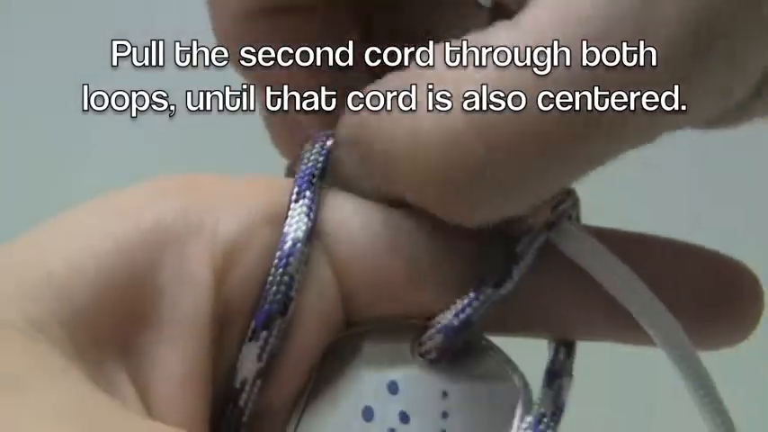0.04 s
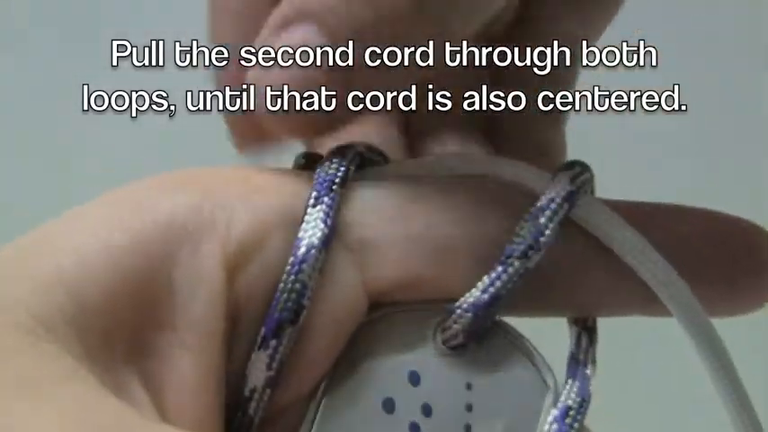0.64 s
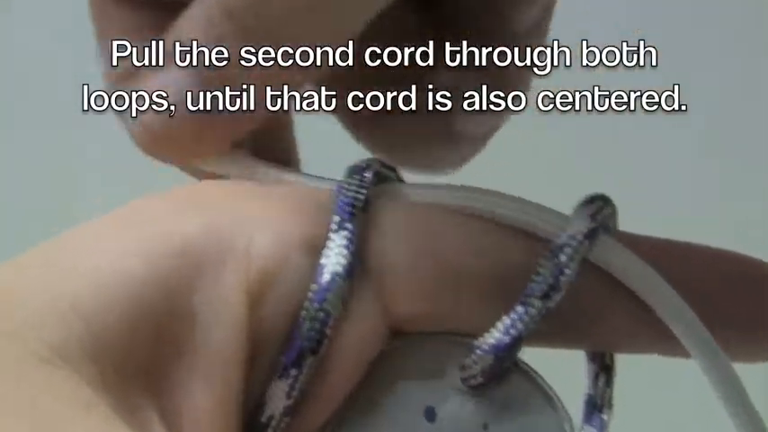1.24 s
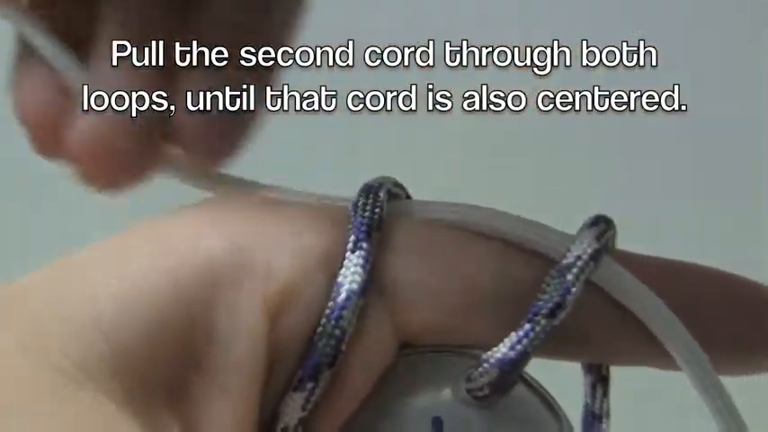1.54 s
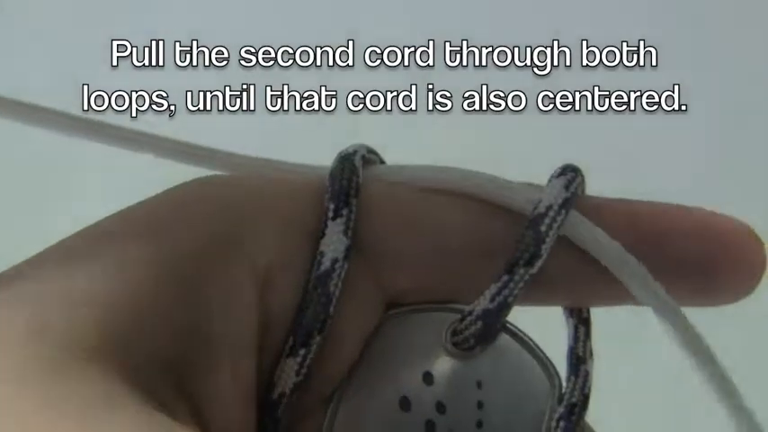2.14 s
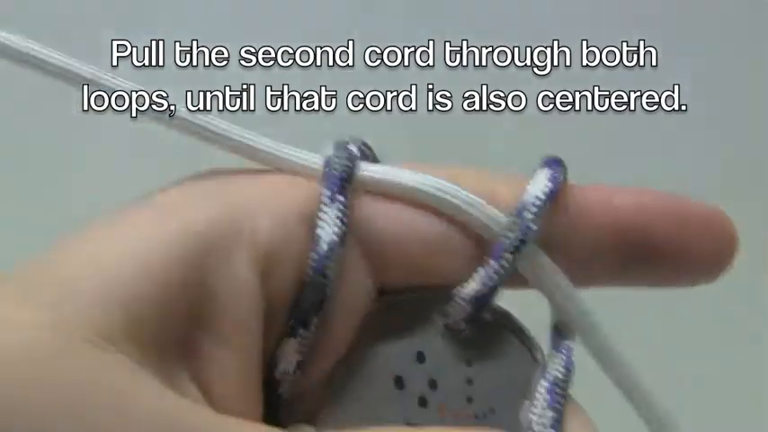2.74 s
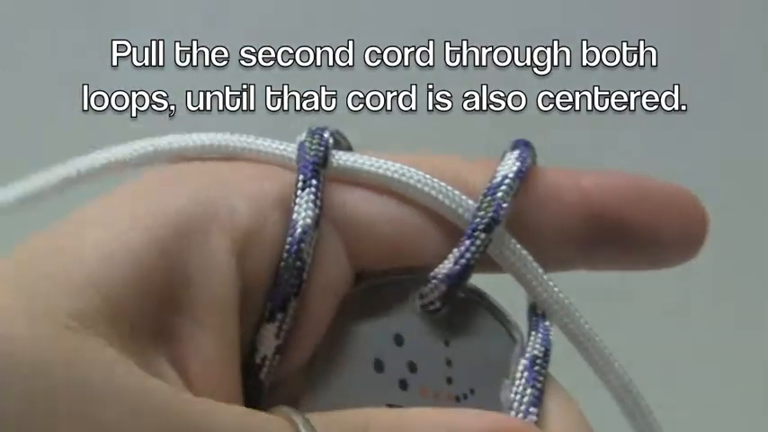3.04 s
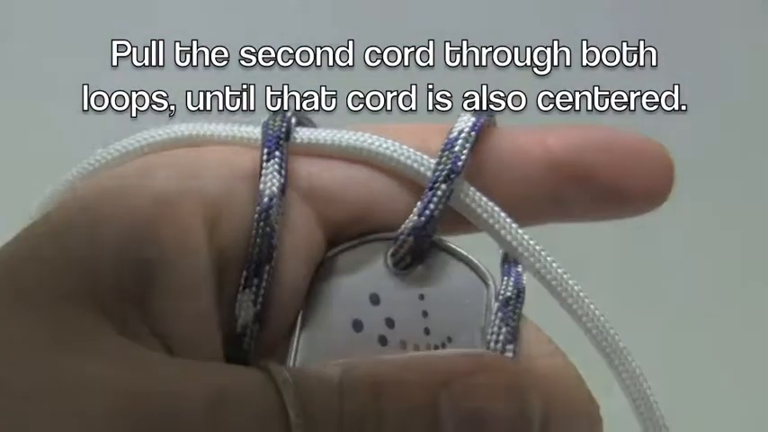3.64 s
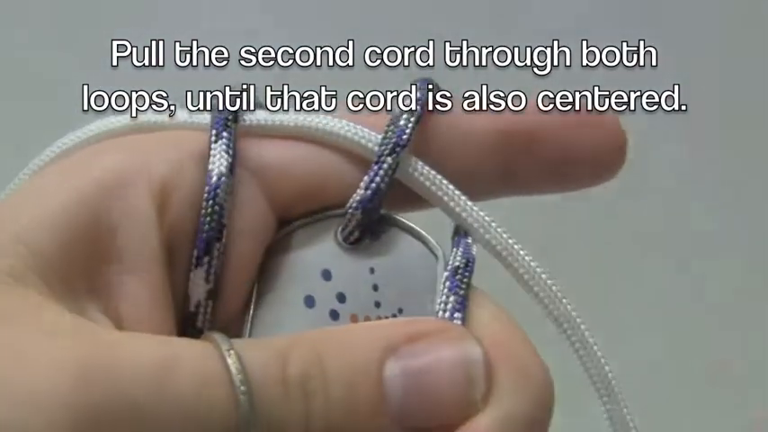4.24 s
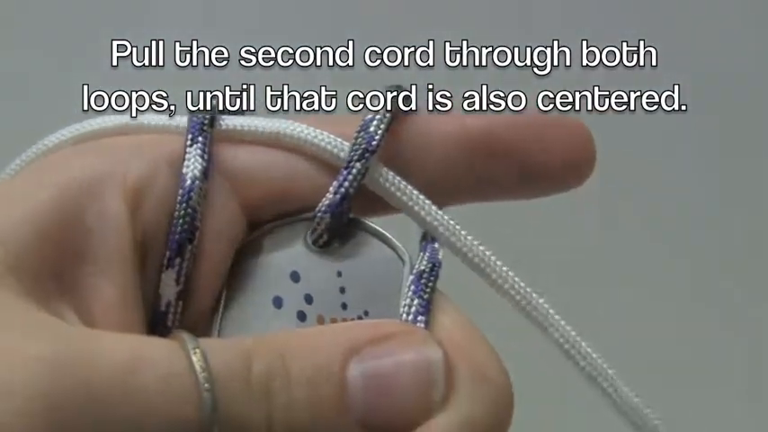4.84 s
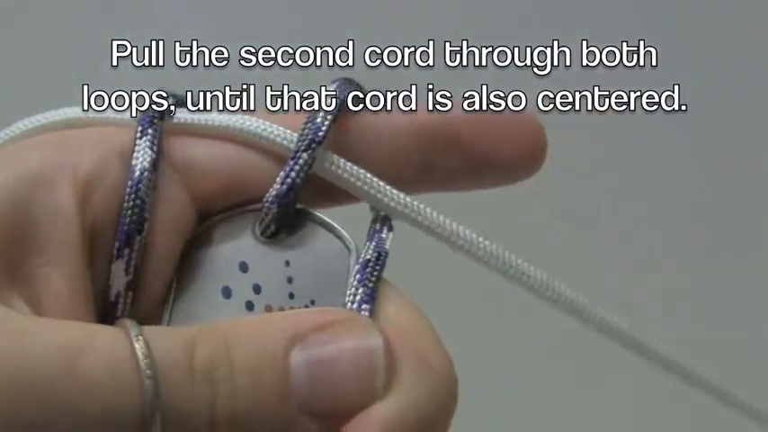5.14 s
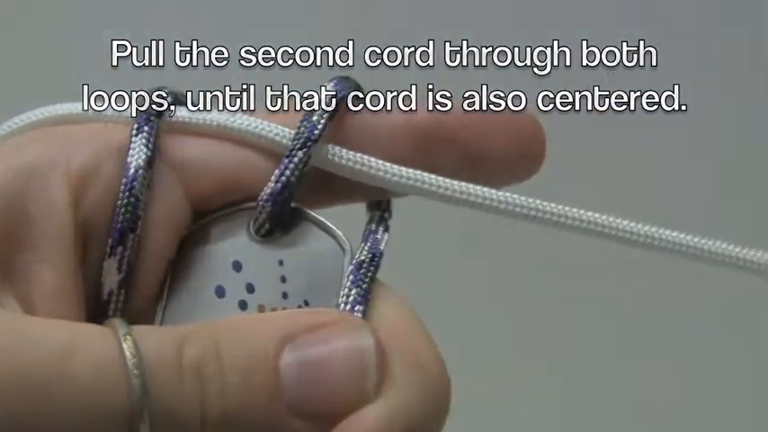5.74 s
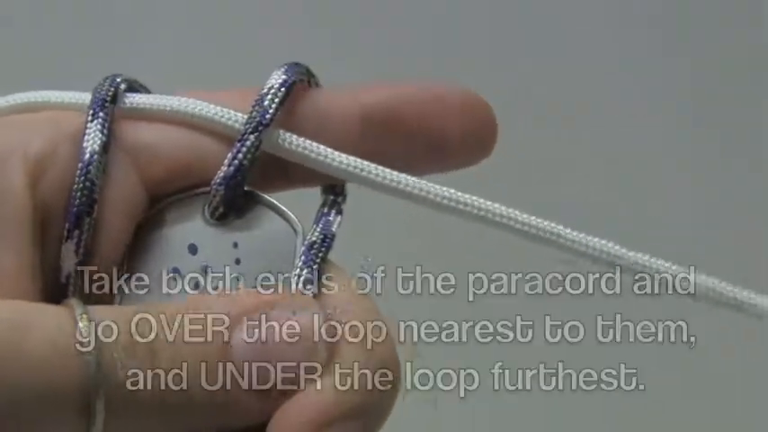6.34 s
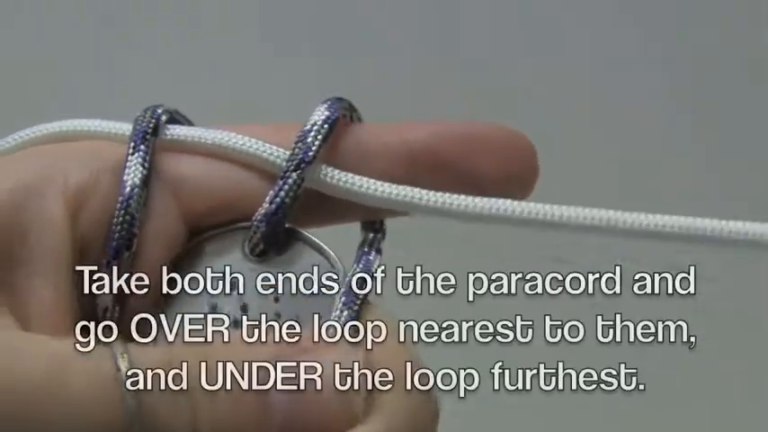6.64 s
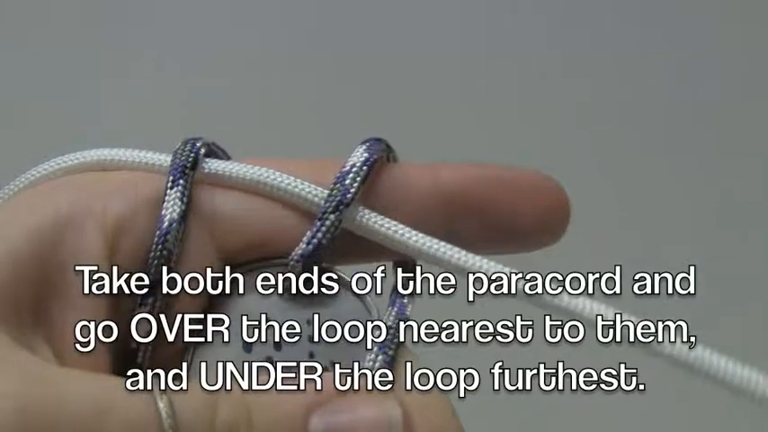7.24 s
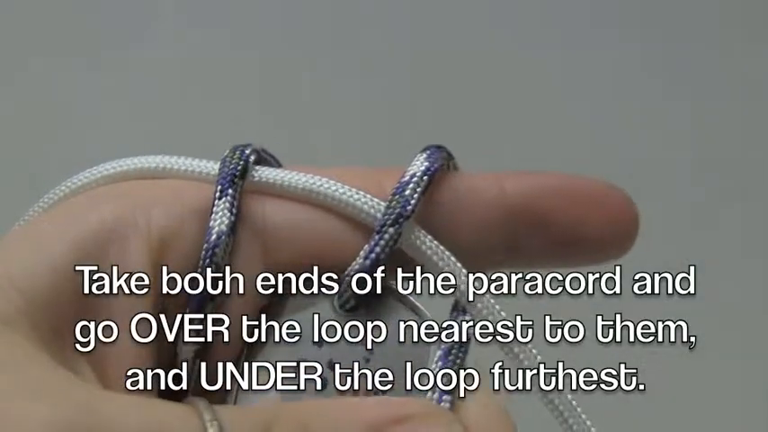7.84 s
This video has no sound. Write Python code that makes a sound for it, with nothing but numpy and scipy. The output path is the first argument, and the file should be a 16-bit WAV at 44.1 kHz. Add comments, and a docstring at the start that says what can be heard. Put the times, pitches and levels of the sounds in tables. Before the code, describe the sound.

A few small fingernail clicks lead into the soft hiss of nylon cord being pulled through loops, heard up close. Midway comes the loudest sound, a hard object hitting a table and bouncing once, leaving a brief ring. Soft finger bumps and a scratchy, slightly squeaky pull follow, then the slack cord flops and slides on the table. Low mains hum and ventilation noise fill the small room throughout.

```python
"""Mains hum and ventilation rumble fill a small room; close by, fingers tick on a nylon cord.
The cord glides through two loops on a finger with the fine hiss of stick-slip friction. Something
hard drops on the work table and bounces once, exciting its normal modes. The cord is drawn back:
its weave rasps through the loops, and its loose length slaps and scrapes on the table."""
import sys
import numpy as np
from scipy import signal
from scipy.fft import rfft, irfft, next_fast_len
from scipy.io import wavfile
from scipy.ndimage import uniform_filter1d, map_coordinates

SR = 44100
rng = np.random.default_rng(int(sys.argv[2]) if len(sys.argv) > 2 else 0)


def store_wav(level_fs):
    """Save 16-bit WAV to argv[1]."""
    pcm = np.round(np.clip(np.atleast_2d(level_fs), -1, 1) * 32767)
    wavfile.write(sys.argv[1], SR, pcm.T.astype(np.int16))


N = 347946
TIME = np.arange(N) / SR


def from_db(db):
    """Amplitude ratio of a level in decibels."""
    return 10 ** (np.asarray(db) / 20)


def rms_one(x):
    """Normalisation to unit power."""
    return x / np.sqrt(np.mean(x ** 2) + 1e-20)


def at_hz(points, hz, column=1):
    """Interpolation of a table along log frequency."""
    points = np.array(points)
    return np.interp(np.log(np.maximum(hz, 1)), np.log(points[:, 0]), points[:, column])


def add(track, s, sound):
    """Superposition of a sound on a track, from time s."""
    start = max(round(s * SR), 0)
    track[start:start + len(sound)] += sound[:N - start]


def colour(x, spectrum, size=4096):
    """Minimum-phase filtering at unit energy: folding the cepstrum makes the response causal."""
    hz = np.fft.rfftfreq(size, 1 / SR)
    cepstrum = irfft(np.log(from_db(at_hz(spectrum, hz))))
    cepstrum[1:size // 2] *= 2
    cepstrum[size // 2 + 1:] = 0
    response = irfft(np.exp(rfft(cepstrum)))
    return signal.oaconvolve(x, response / np.linalg.norm(response))[:len(x)]


def resonate(x, hz, width_hz):
    """Second-order resonance with unit peak gain."""
    hz = min(hz, .4 * SR)
    quality = hz / min(width_hz, SR / 3)
    return signal.lfilter(*signal.iirpeak(hz, quality, fs=SR), x)


def resonate_twice(x, hz, half_width_hz):
    """Two equal resonators in cascade give steeper skirts."""
    return resonate(resonate(x, hz, 2 * half_width_hz), hz, 2 * half_width_hz)


def drift(per_s):
    """Random modulation of unit rms, linear between knots."""
    knots = rng.standard_normal(int(TIME[-1] * per_s) + 2)
    return rms_one(np.interp(TIME * per_s, np.arange(len(knots)), knots))


def envelope(s, db):
    """Smoothed amplitude envelope of a level curve, silent beyond its ends."""
    return uniform_filter1d(from_db(np.interp(TIME, s, db, left=-200, right=-200)), size=128)


# hum partials: f/Hz (rounded below to a mains harmonic), rms level/dB
HUM_PARTIALS = [(59.2, -62), (118.4, -60.5), (177.6, -73), (236.9, -80), (479.1, -79), (597.5, -71),
                (721.4, -73), (839.8, -80.5), (1141, -80.5), (1200, -83.5), (1260, -81.5), (1319, -81),
                (1620, -90), (1798, -83.5)]

def hum(mains_hz=60, dip_s=4.76, beat_s=4.7, beat_depth=0.24):
    """Harmonic series of the mains: each partial wavers in level and the fundamental beats slowly."""
    out = np.zeros(N)
    beat = np.abs(1 - beat_depth * np.exp(2j * np.pi * (TIME - dip_s) / beat_s))
    for hz, db in HUM_PARTIALS:
        harmonic = round(hz / mains_hz)
        gain = from_db(db + 1.1 * drift(3.3)) * (beat if harmonic == 1 else 1)
        out += np.sqrt(2) * gain * np.sin(2 * np.pi * (harmonic * mains_hz * TIME + rng.random()))
    return out


# background noise spectrum: f/Hz, relative level/dB
AIR_SPECTRUM = [(20, -9), (32, -11), (42, -2.5), (75, -5), (100, -2), (170, -3.5), (300, -2.5), (450, -9),
                (700, -11), (1000, -15), (2000, -18), (4000, -21.5), (8000, -25), (15500, -31.5)]
# likeness of left and right: f/Hz, coherence
AIR_COHERENCE = [(60, 0.68), (150, 0.97), (400, 0.4), (2400, 0.58), (15000, 0.53)]

def air(level_db=-58):
    """Partially coherent noise: ventilation rumble and microphone hiss, most alike in the bass."""
    size = next_fast_len(N)
    hz = np.fft.rfftfreq(size, 1 / SR)
    mid, side = rfft(rng.standard_normal((2, size))) * from_db(at_hz(AIR_SPECTRUM, hz))
    coherence = np.clip(at_hz(AIR_COHERENCE, hz), 0, 1)
    stereo = np.sqrt(1 + coherence) * mid + np.sqrt(1 - coherence) * side * [[1], [-1]]
    return from_db(level_db) * rms_one(irfft(stereo)[:, :N])


def impact(decay, size=4096):
    """Broadband excitation: decaying noise, repeatedly whitened and cut at three time constants."""
    t = TIME[:size]
    burst = rng.standard_normal(size) * np.exp(-t / decay)
    for _ in range(6):
        spectrum = rfft(burst)
        burst = irfft(spectrum / (np.abs(spectrum) + 1e-12)) * (t < 3 * decay)
    return burst


def at_level(burst, db, decay):
    """Energy scaling to match an exponential decay that starts at this rms level."""
    return from_db(db) * np.sqrt(decay * SR / 2) * burst / np.linalg.norm(burst)


# snaps of nail and braid: t/s, level/dB, decay/s, tilt/(dB per octave)
TICKS = [(0.131, -45.5, 0.0045, 8.5), (0.3017, -49.5, 0.0017, -1), (0.3759, -34.5, 0.0018, 6.5),
         (2.8978, -49, 0.011, -3.5), (2.916, -52, 0.011, 1), (5.135, -51.5, 0.008, 6),
         (5.352, -42, 0.0027, 1), (5.3643, -41, 0.0022, 0), (6.0172, -31.5, 0.00157, -1),
         (6.0313, -37, 0.0011, -2), (6.061, -30.5, 0.0035, -3), (6.1222, -42.5, 0.0032, 3)]
# spectrum common to all snaps: f/Hz, relative level/dB
TICK_SPECTRUM = [(200, -23), (600, -11.5), (1300, -5), (2300, -2), (4100, -2.5), (4750, 3), (5500, -2),
                 (6400, -7.5), (8300, -8.5), (9400, -5.5), (11000, -14.5), (12700, -14), (14200, -18),
                 (16000, -27)]

def ticks():
    """Impulsive release of nails and snagged strands; spectral tilt sets each snap's brightness."""
    out = np.zeros(N)
    for s, db, decay, tilt in TICKS + snags():
        spectrum = [(hz, level + tilt * np.log2(hz)) for hz, level in TICK_SPECTRUM]
        add(out, s, at_level(colour(impact(decay), spectrum), db, decay))
    return out


# snagging as the cord is fed in and drawn back: start t/s, end t/s, level/dB
SNAG_SPELLS = [(0.555, 0.9, -55), (5.382, 6.02, -41.5)]

def snags(per_s=13, spread_db=3.0, decay_s=0.0027, tilt_db_per_octave=2.0):
    """Jittered pulse train: strands catch once per time slot, giving further rows of ticks."""
    rows = []
    for start, end, db in SNAG_SPELLS:
        for slot, (jitter, strength, tilt) in enumerate(rng.uniform(-1, 1, (20, 3))):
            s = start + (slot + .5 + .5 * jitter) / per_s
            if s < end:
                rows.append((s, db + spread_db * strength, decay_s, tilt_db_per_octave * tilt))
    return rows


def friction(per_s, spread_db, flutter_db, flutter_per_s):
    """Stick-slip friction as shot noise: fibres let go unevenly, fluttering as the weave passes."""
    sizes = from_db(spread_db * np.minimum(rng.exponential(1, N), 4)) * rng.choice([-1, 1], N)
    slips = sizes * (rng.random(N) < per_s / SR)
    return rms_one(slips * from_db(flutter_db * drift(flutter_per_s)))


# hiss of the first pull, standing for its speed: t/s, level/dB
GLIDE_LEVELS = [(1.16, -87), (1.222, -62), (1.332, -57), (1.53, -60), (1.564, -55.5), (1.804, -59.5),
                (2.306, -53), (2.774, -49.5), (2.87, -58.5), (2.89, -70)]
# friction spectra of slack and of taut cord: f/Hz, relative level/dB
SLACK_SPECTRUM = [(1180, -44), (2000, -9), (2220, -14), (2910, 1.5), (3520, -11.5), (4120, -9), (4730, -1),
                  (5300, -2.5), (6090, -11.5), (7250, -7.5), (8630, -9.5), (11400, -13.5), (13200, -14),
                  (15200, -18), (16000, -45)]
TAUT_SPECTRUM = [(1180, -45), (2000, -16), (2260, -15), (2460, -17), (2710, -11), (3490, -14), (4820, -3),
                 (5490, -1.5), (6820, -9), (8260, -3.5), (9920, -5), (10900, -9), (14700, -15),
                 (16000, -24)]

def glide(tighten_from_s=1.78, tighten_s=0.52, slack_tension=0.1, trim_db=1):
    """Sliding friction: tension raises the resonances, by an equal-power fade from slack to taut."""
    slips = friction(per_s=18000, spread_db=3.5, flutter_db=1.0, flutter_per_s=150)
    tension = np.clip(slack_tension + np.maximum(TIME - tighten_from_s, 0) / tighten_s, 0, 1)
    slack = colour(slips, SLACK_SPECTRUM)
    taut = colour(slips[::-1], TAUT_SPECTRUM)  # reversal decorrelates the two
    hiss = np.sqrt(1 - tension) * slack + np.sqrt(tension) * taut
    return envelope(*np.transpose(GLIDE_LEVELS)) * from_db(trim_db + drift(22.44)) * hiss


# light touches of cord and hand: centre t/s, duration/s, level/dB, f/Hz, resonator half-width/Hz
BRUSHES = [(1.696, 0.05, -58, 5000, 1200), (2.153, 0.43, -62, 450, 396), (2.93, 0.082, -56, 36.2, 30),
           (2.957, 0.36, -66.5, 2630, 220), (3.992, 0.09, -59.5, 4240, 2600),
           (4.772, 0.098, -63.5, 11000, 5000), (5.069, 0.053, -54.5, 535, 300),
           (5.07, 0.05, -58, 4400, 1500), (5.186, 0.042, -48.5, 2780, 300), (5.439, 0.035, -50, 434, 200),
           (5.53, 0.18, -50.5, 4140, 1000), (5.889, 0.053, -45, 2460, 1400), (6.041, 0.15, -51, 3000, 3850),
           (6.145, 0.18, -58, 2100, 1510), (6.903, 0.23, -64, 2580, 506), (7.689, 0.19, -56, 220, 216)]

def brushes():
    """Band-limited friction: each touch swells and fades in one resonance."""
    out = np.zeros(N)
    slips = friction(per_s=6000, spread_db=-0.5, flutter_db=2.0, flutter_per_s=120)
    for s, length, db, hz, half_width in BRUSHES:
        start = s - length / 2
        swell = np.sqrt(np.hanning(int(length * SR)))
        touch = slips[int(start * SR):][:len(swell)]
        band = rms_one(resonate_twice(touch, hz, half_width))
        add(out, start, from_db(db) * swell[:len(touch)] * band)
    return out


# soft landings of the fingers: t/s, level/dB, decay/s, f/Hz, resonator half-width/Hz
BUMPS = [(2.173, -47.5, 0.0073, 700, 1440), (5.042, -46, 0.0033, 750, 900),
         (5.121, -35.5, 0.0087, 463, 138), (5.168, -43, 0.004, 550, 500), (5.58, -43.5, 0.0073, 380, 150),
         (7.655, -50.5, 0.0046, 380, 1000)]

def bumps():
    """Damped impact: each finger excites one low resonance."""
    out = np.zeros(N)
    for s, db, decay, hz, half_width in BUMPS:
        add(out, s, at_level(resonate_twice(impact(decay), hz, half_width), db, decay))
    return out


# contacts of the falling object: t/s, level/dB, decay/s, low-pass f/Hz
KNOCKS = [(3.5203, -25.5, 0.003, 1970), (3.525, -16, 0.0043, 5000), (3.5255, -7.5, 0.0027, 13700),
          (3.5386, -27.5, 0.0039, 14000), (3.6200, -27.5, 0.0056, 13200)]
# contact spectrum: f/Hz, relative level/dB
KNOCK_SPECTRUM = [(60, -25.5), (150, -18.5), (260, -3), (570, -4.5), (800, -9), (1500, -9.5), (2200, -6.5),
                  (2650, -1), (3200, -6), (4100, 0), (5500, -3.5), (7500, -2.5), (10300, -13.5),
                  (11700, -7.5), (16000, -17)]
# normal modes of the table: f/Hz, level/dB re the bare contact, T60/s
TABLE_MODES = [(97, 20.5, 0.76), (276, 3, 0.63), (405, 7.5, 0.27), (1607, 3.5, 0.13), (2436, -3, 0.29),
               (2615, 5, 0.03), (2700, -3, 0.3), (2770, -6, 0.29)]

def drop():
    """Modal excitation: a dull touch, a sharp clack and one bounce each set the table ringing."""
    contacts = np.zeros(N)
    for s, db, decay, cutoff_hz in KNOCKS:
        lowpass = signal.butter(1, cutoff_hz, fs=SR)
        contact = signal.lfilter(*lowpass, colour(impact(decay), KNOCK_SPECTRUM))
        add(contacts, s, at_level(contact, db, decay))
    ringing = sum(from_db(db) * resonate(contacts + 1e-18, hz, width_hz=np.log(1000) / (np.pi * t60))
                  for hz, db, t60 in TABLE_MODES)
    return contacts + ringing


def stroke(slips, levels, rub_db, rasp_trim_db, hiss_trim_db, rub_follows=0.55):
    """Three-band amplitude modulation: low rub and high hiss follow the level of the rasp."""
    s, rasp, treble = np.transpose(levels)
    bands = [((200, 1000), rub_db + rub_follows * (rasp - rasp.mean())),
             ((1000, 6500), rasp + rasp_trim_db),
             ((6500, 17000), rasp + treble + hiss_trim_db)]
    out = np.zeros(N)
    for edges_hz, db in bands:
        bandpass = signal.butter(4, edges_hz, "band", fs=SR, output="sos")
        out += envelope(s, db) * rms_one(signal.sosfilt(bandpass, slips))
    return out


# the cord starts back: t/s, rasp level/dB, relative treble level/dB
CREEP_LEVELS = [(4.72, -68.5, -3), (5.25, -58, -9), (5.52, -54, -10)]
# slow friction spectrum: f/Hz, relative level/dB
CREEP_SPECTRUM = [(200, -2), (450, 5), (800, -7.5), (1600, -12.5), (2700, -3.5), (3300, -10.5),
                  (4300, -6.5), (6300, -14.5), (9300, -11), (10400, -22), (12000, -12), (16000, -22)]

def creep():
    """Low-speed friction: sparser slips grow louder as the braid gathers speed."""
    slips = friction(per_s=5000, spread_db=3.0, flutter_db=1.5, flutter_per_s=77)
    rasp = colour(slips, CREEP_SPECTRUM)
    return stroke(rasp, CREEP_LEVELS, rub_db=-63, rasp_trim_db=0.0, hiss_trim_db=-3.0)


# loose cord flops on the table: t/s, level/dB
SLAPS = [(5.169, -47), (6.2285, -27.5), (6.242, -36), (6.2645, -41), (6.2836, -36), (6.296, -37),
         (6.3333, -36)]
# spectrum of cord on table: f/Hz, relative level/dB
TABLETOP_SPECTRUM = [(200, -6), (450, -3.5), (1200, -6.5), (2300, 1), (3000, 4.5), (3600, -6), (4500, -0.5),
                     (6000, -11), (8100, -11), (9700, -21.5), (12800, -17), (16000, -29)]
# resonances the cord excites there: f/Hz, bandwidth/Hz, relative level/dB
TABLETOP_PEAKS = [(2200, 160, -21), (2780, 93, -2), (3000, 200, 7.5), (4600, 450, 4.5)]

def slaps(decay_s=0.004):
    """Impulse excitation: each flop strikes the same resonances as the scrape."""
    out = np.zeros(N)
    for s, db in SLAPS:
        contact = colour(impact(decay_s), TABLETOP_SPECTRUM)
        ringing = sum(from_db(peak_db) * resonate(contact, hz, width)
                      for hz, width, peak_db in TABLETOP_PEAKS)
        add(out, s, at_level(contact + 0.55 * ringing, db, decay_s))
    return out


def squeaks(slips, peaks, wander_per_s, wander_db=4.0, pitch_spread=0.025):
    """A moving contact point modulates the resonances at random in level and pitch."""
    ringing = sum(from_db(db + wander_db * np.tanh(drift(wander_per_s))) * resonate(slips, hz, width)
                  for hz, width, db in peaks)
    warped_samples = np.cumsum(1 + pitch_spread * drift(per_s=30))
    return map_coordinates(ringing, [warped_samples], order=3, mode="mirror")


# uneven surges back through the loops: t/s, rasp level/dB, relative treble level/dB
DRAG_LEVELS = [(5.5, -55, -6.5), (5.72, -44, -7.5), (5.77, -57, -2), (5.814, -47, -1.5), (5.848, -50.5, -6),
               (5.886, -41, -14), (5.946, -57, -7), (5.975, -52, -8)]
# friction spectrum of the weave: f/Hz, relative level/dB
DRAG_SPECTRUM = [(150, -51), (250, -7), (354, -6.5), (629, -15), (710, -11.5), (875, -8), (1580, -8),
                 (2710, -4), (3230, -9.5), (4650, -8.5), (7570, -13.5), (8550, -5), (10500, -16),
                 (12300, -6), (16000, -23)]
# squeaky resonances of the weave: f/Hz, bandwidth/Hz, relative level/dB
DRAG_PEAKS = [(2220, 160, 7), (2680, 180, -12), (4400, 640, -1)]

def drag():
    """Friction-excited resonance: the braid rasps and squeaks back through the loops."""
    slips = friction(per_s=7000, spread_db=1.0, flutter_db=1.5, flutter_per_s=280)
    rasp = colour(slips, DRAG_SPECTRUM)
    squeaky = rasp + .5 * squeaks(rasp, DRAG_PEAKS, wander_per_s=83)
    return stroke(squeaky, DRAG_LEVELS, rub_db=-60, rasp_trim_db=0.7, hiss_trim_db=-0.5)


# loose cord slides over the table: t/s, rasp level/dB, relative treble level/dB
SCRAPE_LEVELS = [(6.235, -32.5, -28), (6.253, -44, -18), (6.291, -43.5, -19), (6.357, -47, -5),
                 (6.417, -38.5, -16.5), (6.457, -50.5, -5.5), (6.549, -38.5, -10), (6.7, -70, -13)]

def scrape(ring_db=5.5, fall_db_per_s=24.0):
    """Forced vibration: coarser slips drive the table top, which rings most as the cord lands."""
    slips = friction(per_s=6000, spread_db=2.0, flutter_db=1.5, flutter_per_s=220)
    rasp = colour(slips, TABLETOP_SPECTRUM)
    start, end = SCRAPE_LEVELS[0][0], SCRAPE_LEVELS[-1][0]
    ring_gain = .5 * from_db(ring_db - fall_db_per_s * np.clip(TIME - start, 0, end - start))
    ringing = rasp + ring_gain * squeaks(rasp, TABLETOP_PEAKS, wander_per_s=60)
    return stroke(ringing, SCRAPE_LEVELS, rub_db=-60, rasp_trim_db=2.0, hiss_trim_db=-0.5)


# reverberation of the room: f/Hz, T60/s, level/dB
REVERBERATION = [(100, 0.77, -18), (300, 0.51, -10.5), (1000, 0.44, -4), (2600, 0.63, -12.5),
                 (5000, 0.5, -13), (9000, 0.41, -15), (14950, 0.28, -15)]

def room(x, early_db=-13.5, early_decay_s=0.0099, side_share=0.32, size=32768):
    """Early reflections off hands and table, then a diffuse tail that dies soonest in the treble."""
    t, edges = TIME[:size], np.geomspace(60, 18000, num=13)
    mid, side = rng.standard_normal((2, size))
    white = mid + side_share * side * [[1], [-1]]
    response = from_db(early_db) * rms_one(white * np.exp(-t / early_decay_s) * (t > .001))
    for low, high in zip(edges, edges[1:]):
        hz = np.sqrt(low * high)
        bandpass = signal.butter(2, [low, high], "band", fs=SR, output="sos")
        band = signal.sosfilt(bandpass, np.roll(white, rng.integers(size), axis=1))
        fade = from_db(-60 * t / at_hz(REVERBERATION, hz)) * (t > .007)
        gain = from_db(at_hz(REVERBERATION, hz, column=2)) * np.sqrt(2 * (high - low) / SR)
        response += gain * rms_one(band * fade)
    return signal.fftconvolve(x, response / np.sqrt(size), axes=1)[:, :N]


def pan(x, left_db):
    """Localisation by level difference between two microphones."""
    return x * from_db([[left_db / 2], [-left_db / 2]])


def place(x, balance, phase):
    """Localisation by frequency-dependent level and phase differences."""
    size = next_fast_len(N + 4096)
    hz = np.fft.rfftfreq(size, 1 / SR)
    left = from_db(at_hz(balance, hz) / 2) * np.exp(.5j * at_hz(phase, hz))
    return irfft(rfft(x, size) * [left, 1 / left], size)[:, :N]


# level differences for object and cord: f/Hz, left minus right level/dB
DROP_BALANCE = [(60, -7), (92, 0), (140, 9), (210, 3), (330, -1), (500, -2), (770, -3), (1170, 4),
                (1790, -1), (2740, 1.5), (4190, -0.5), (6410, 2), (9810, -2.5), (15000, 1.5)]
CORD_BALANCE = [(60, 1.5), (120, 1.5), (240, 0), (480, -4.5), (950, -1), (1890, -0.3), (3770, -0.2),
                (7520, -0.2), (15000, 0)]
# phase differences for object and cord: f/Hz, lead of left/rad
DROP_PHASE = [(100, 0.07), (1000, 0.35), (4000, 0.4), (8000, 1), (15000, 0.5)]
CORD_PHASE = [(100, -0.21), (3000, -0.047), (9000, -0.85), (12000, 0.74), (15000, 0.087)]

def scene():
    """Direct-to-reverberant ratio: sounds on the fingers are drier than those on the table."""
    on_fingers = pan(glide(), left_db=0.1)
    on_fingers += place(creep() + drag(), CORD_BALANCE, CORD_PHASE)
    on_fingers += pan(ticks() + bumps() + brushes(), left_db=-0.8)
    on_table = place(pan(scrape() + slaps(), left_db=-2.2), CORD_BALANCE, CORD_PHASE)
    on_table += place(drop(), DROP_BALANCE, DROP_PHASE)
    direct = from_db(-0.56) * (on_fingers + on_table)
    reverberant = room(from_db(-4.5) * on_fingers + on_table)
    return direct + reverberant + pan(hum(), left_db=1.0) + air()


def record(dry):
    """Soft saturation rounds the loudest peak; an elliptic low-pass limits the bandwidth."""
    ceiling, cutoff_hz = 0.95, 15750
    rounded = np.tanh(dry / ceiling) * ceiling
    return signal.sosfilt(signal.ellip(12, .1, 80, cutoff_hz, fs=SR, output="sos"), rounded)


dry = scene()
out = record(dry)
store_wav(out)
```